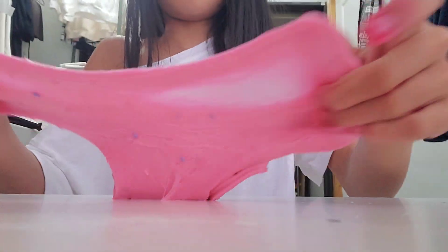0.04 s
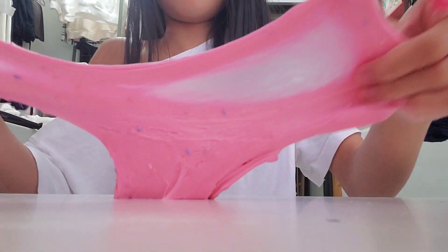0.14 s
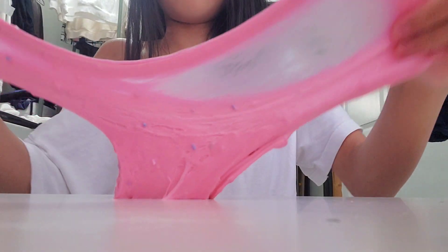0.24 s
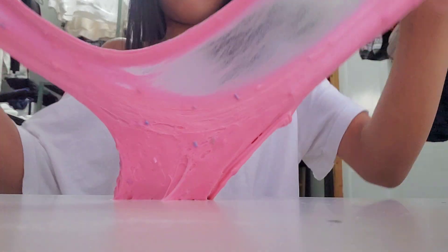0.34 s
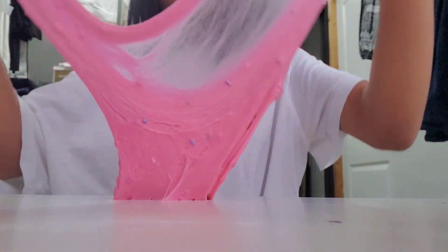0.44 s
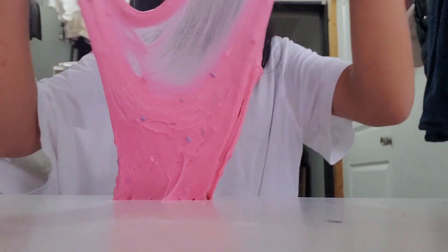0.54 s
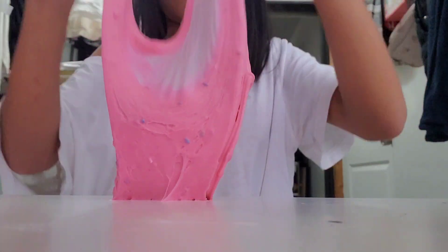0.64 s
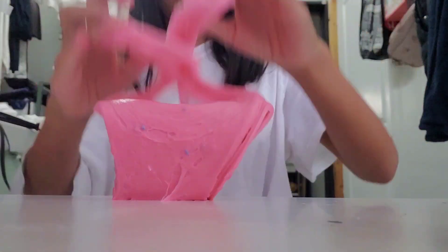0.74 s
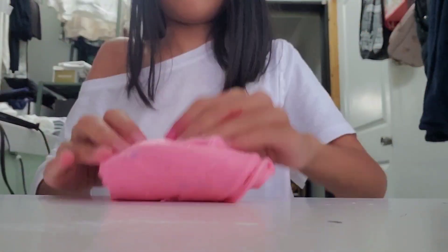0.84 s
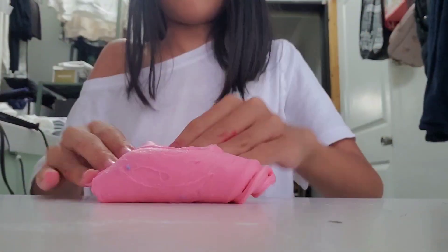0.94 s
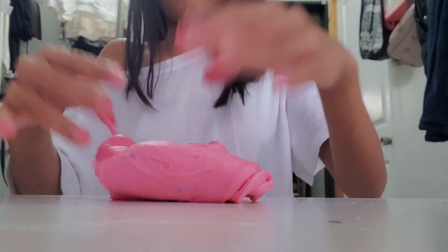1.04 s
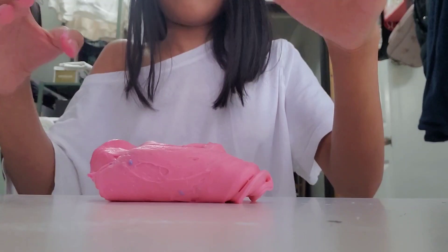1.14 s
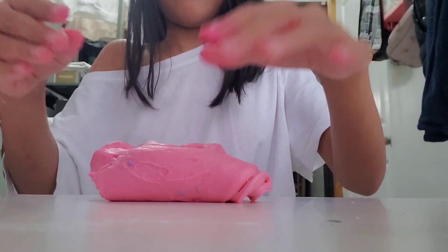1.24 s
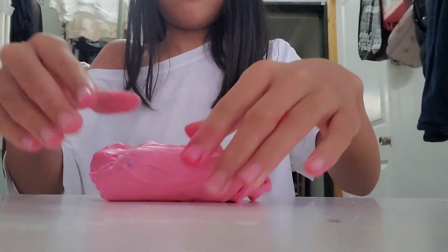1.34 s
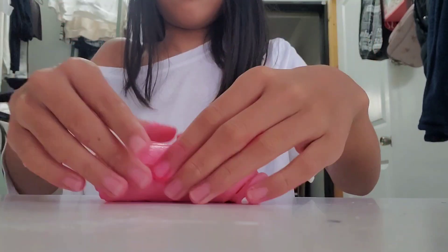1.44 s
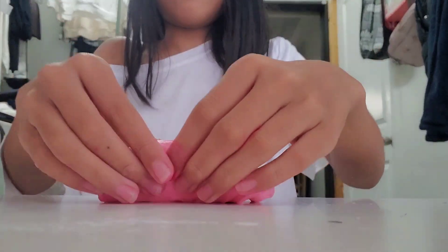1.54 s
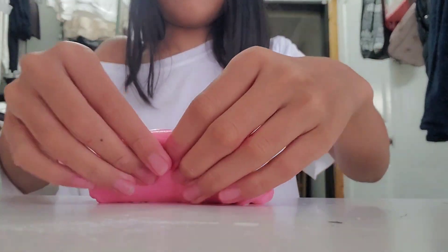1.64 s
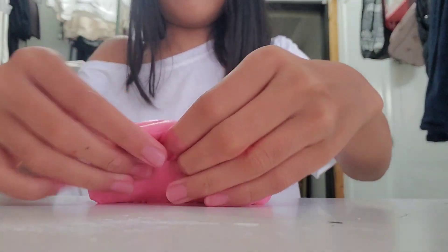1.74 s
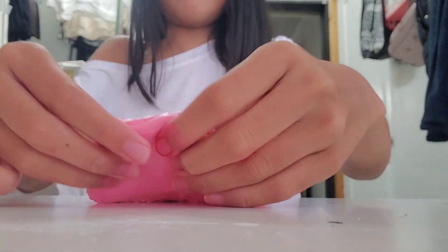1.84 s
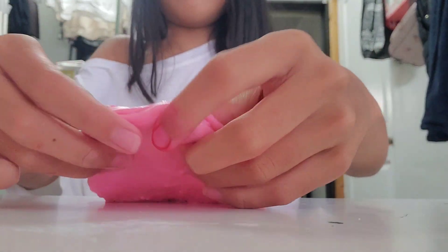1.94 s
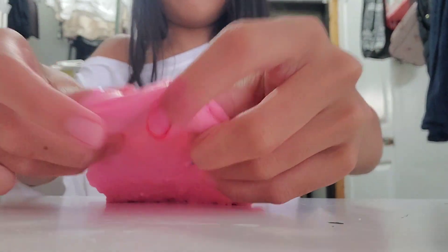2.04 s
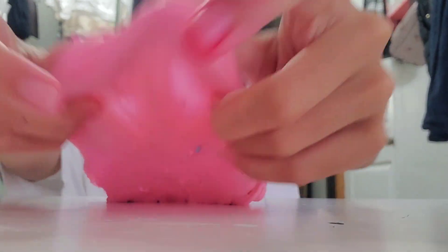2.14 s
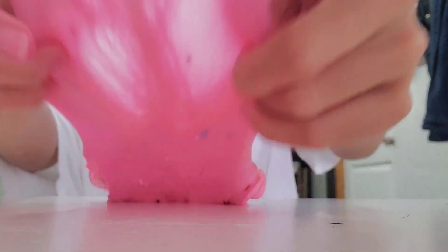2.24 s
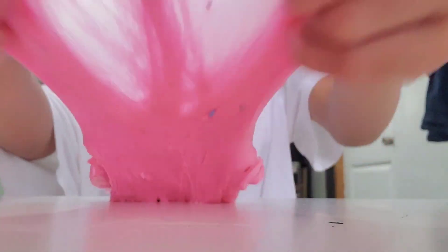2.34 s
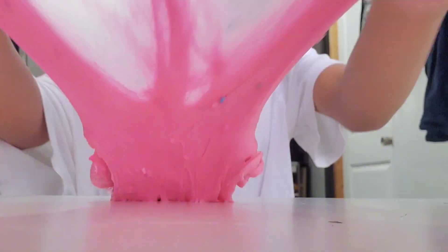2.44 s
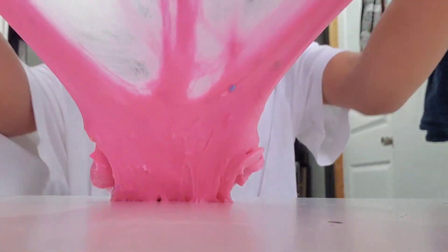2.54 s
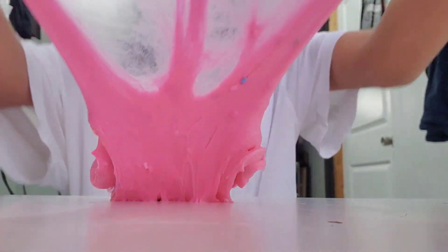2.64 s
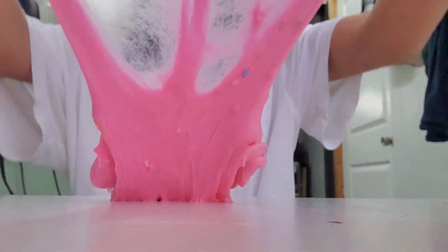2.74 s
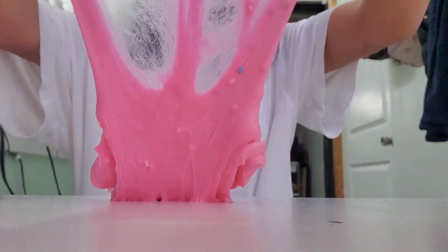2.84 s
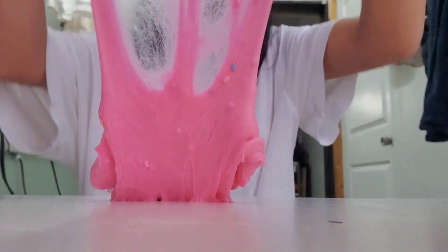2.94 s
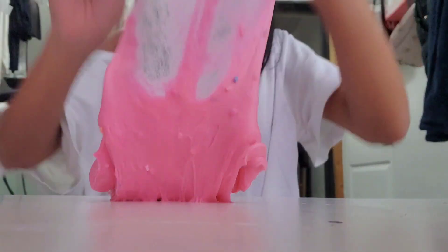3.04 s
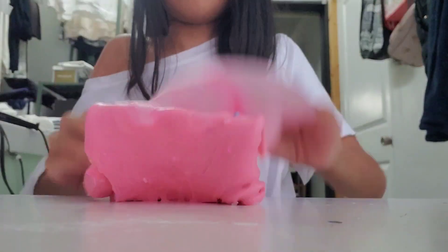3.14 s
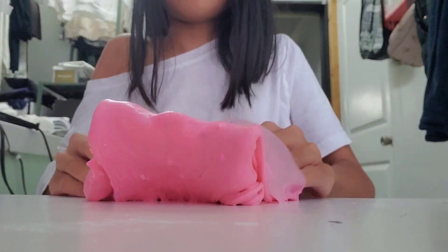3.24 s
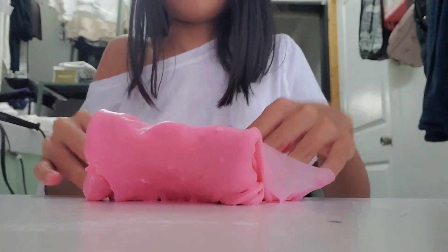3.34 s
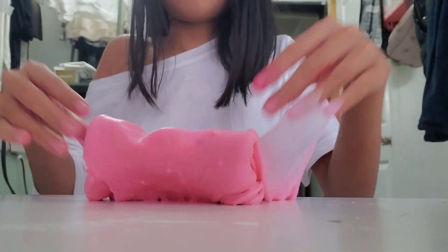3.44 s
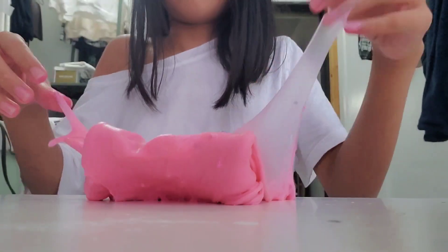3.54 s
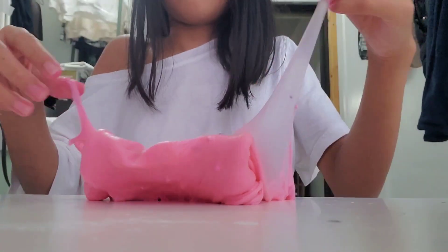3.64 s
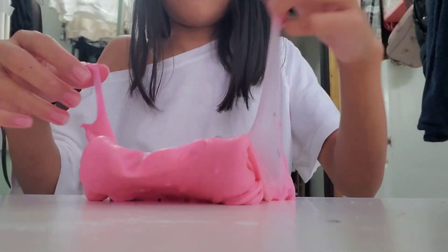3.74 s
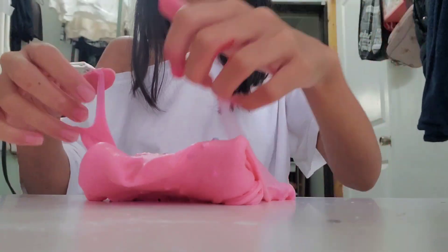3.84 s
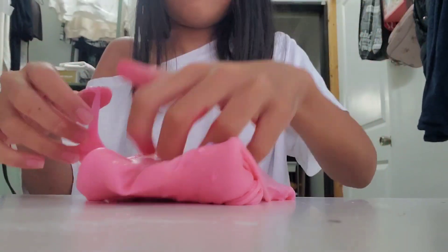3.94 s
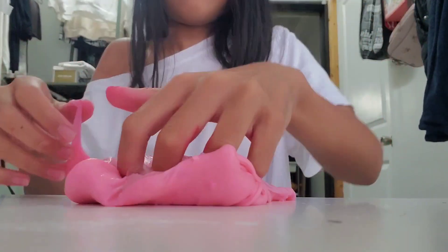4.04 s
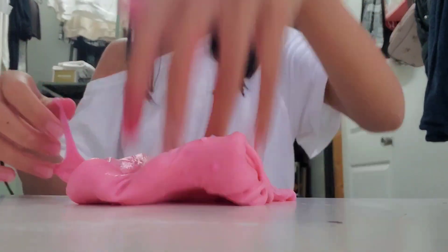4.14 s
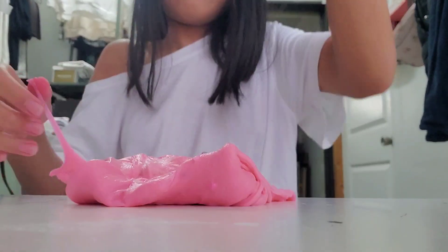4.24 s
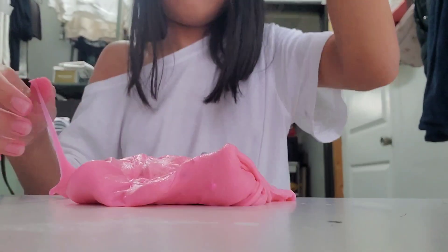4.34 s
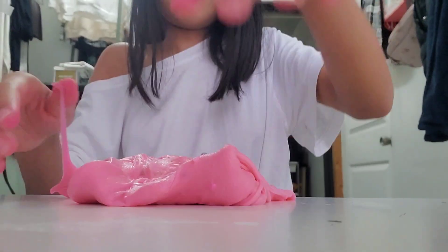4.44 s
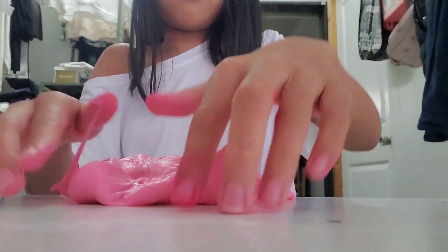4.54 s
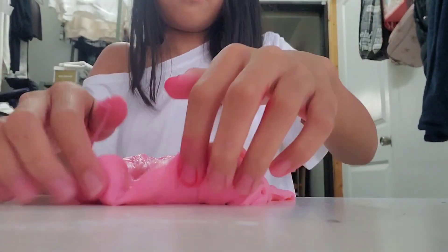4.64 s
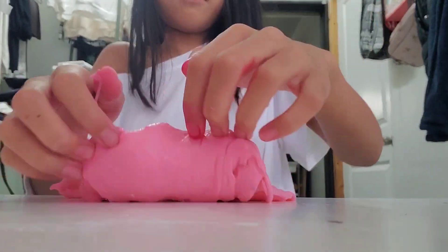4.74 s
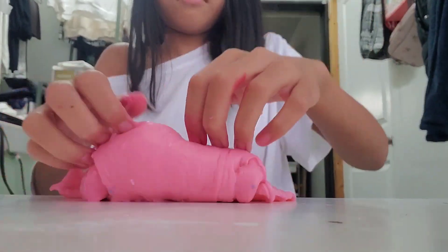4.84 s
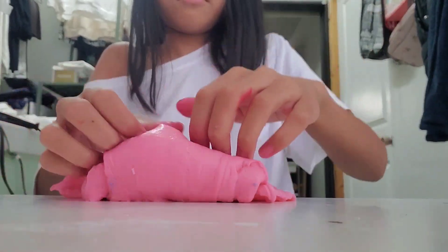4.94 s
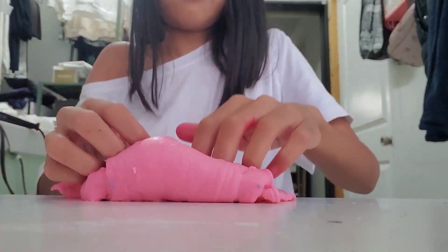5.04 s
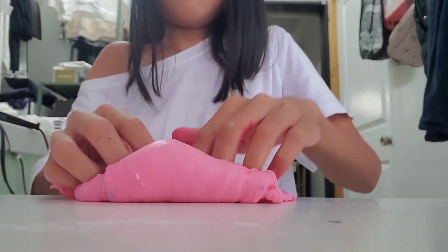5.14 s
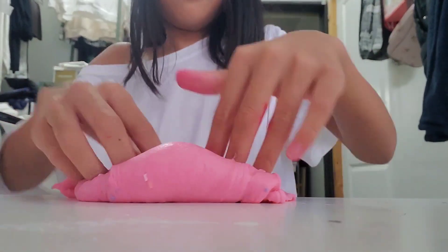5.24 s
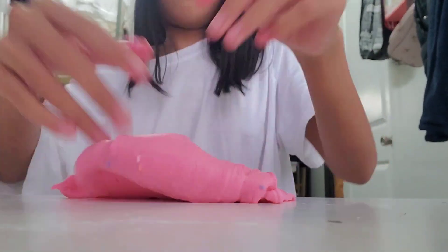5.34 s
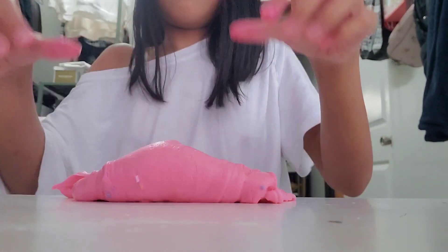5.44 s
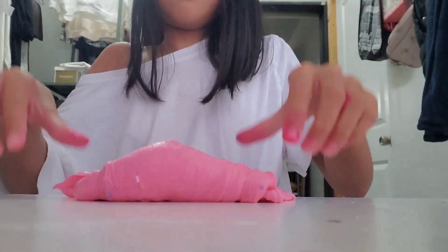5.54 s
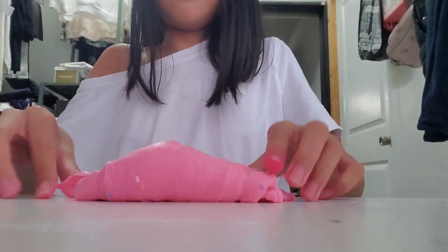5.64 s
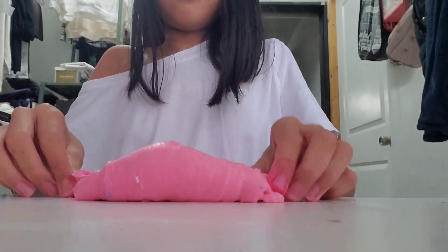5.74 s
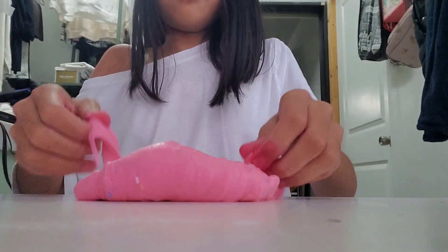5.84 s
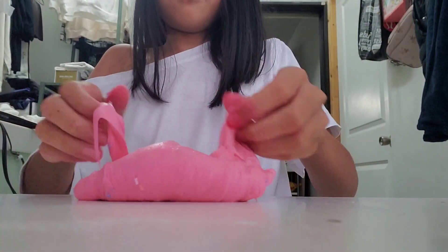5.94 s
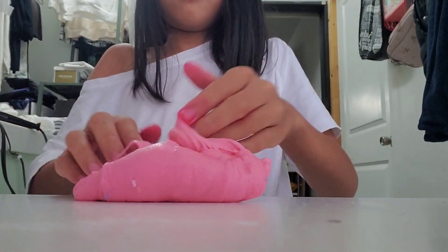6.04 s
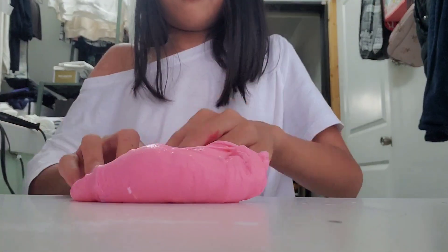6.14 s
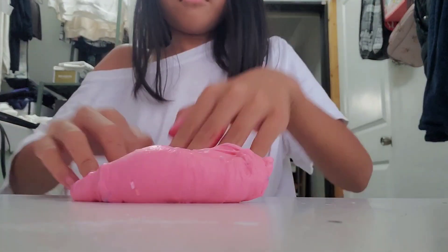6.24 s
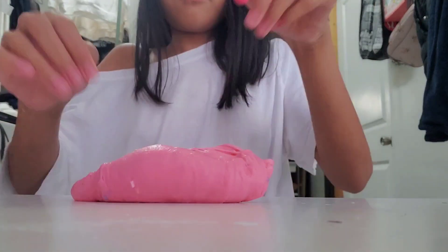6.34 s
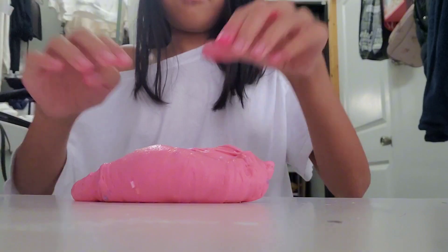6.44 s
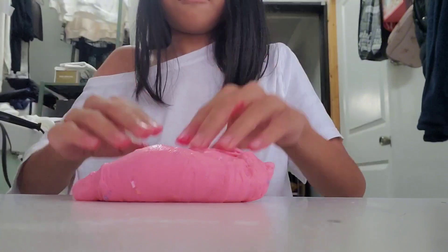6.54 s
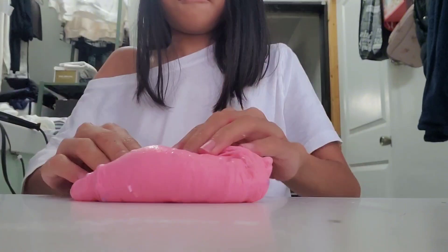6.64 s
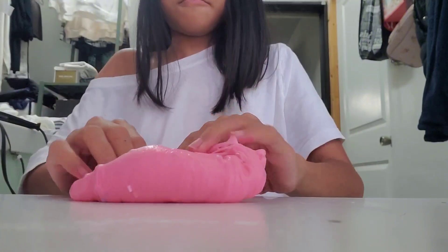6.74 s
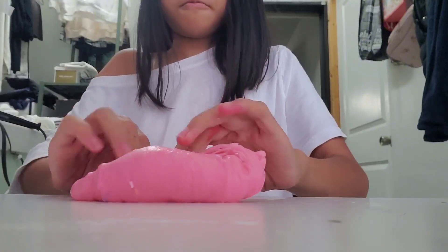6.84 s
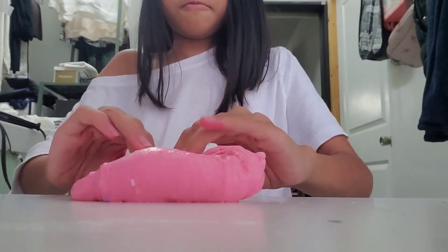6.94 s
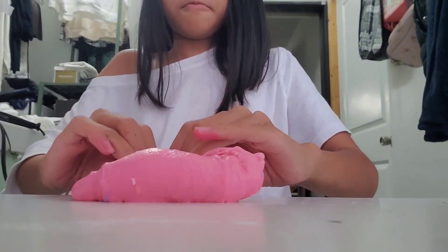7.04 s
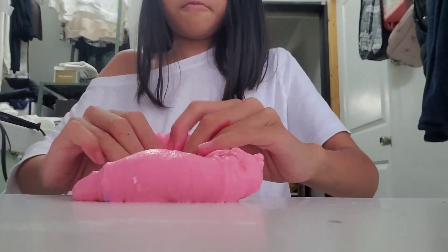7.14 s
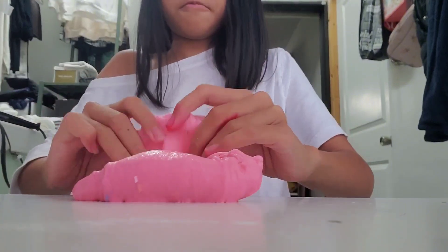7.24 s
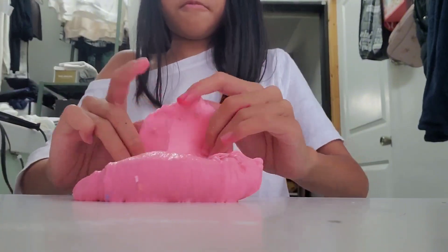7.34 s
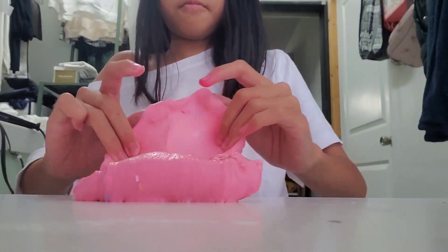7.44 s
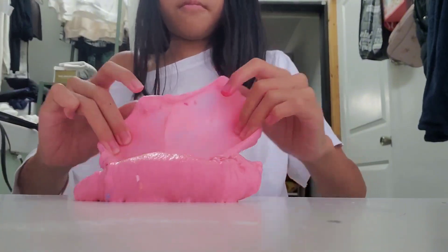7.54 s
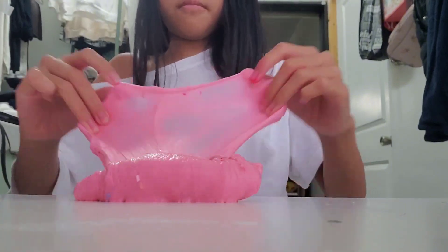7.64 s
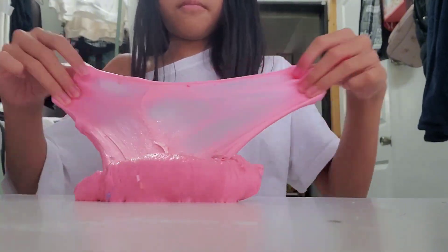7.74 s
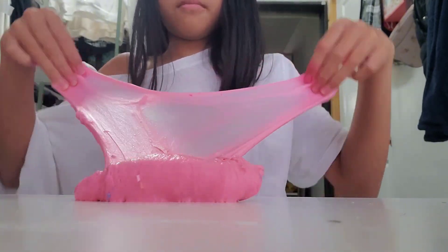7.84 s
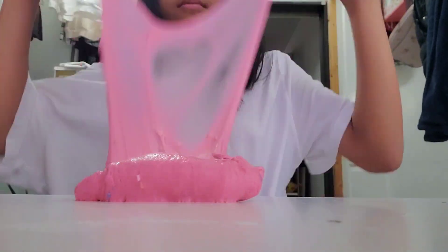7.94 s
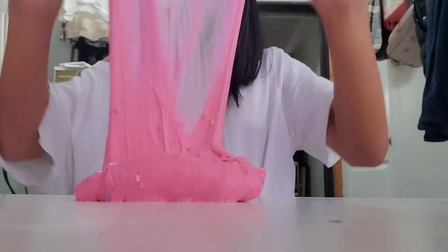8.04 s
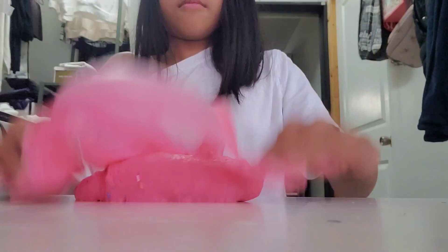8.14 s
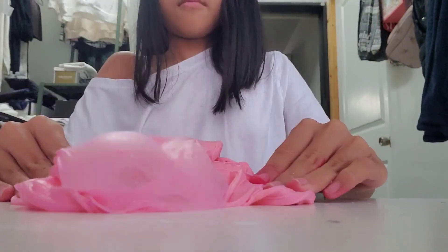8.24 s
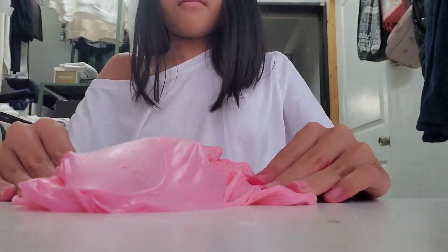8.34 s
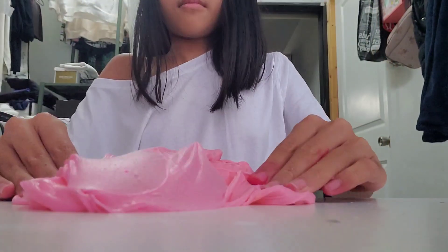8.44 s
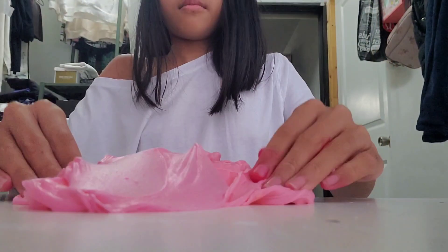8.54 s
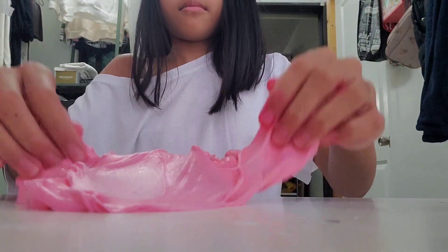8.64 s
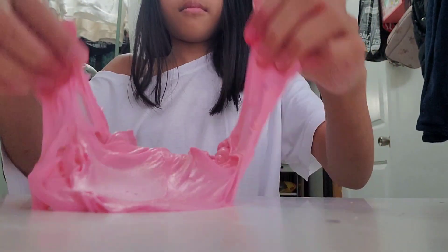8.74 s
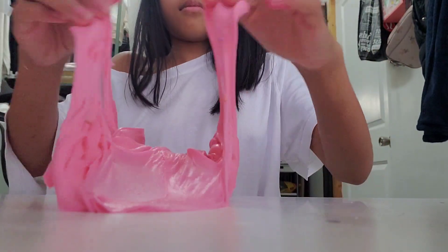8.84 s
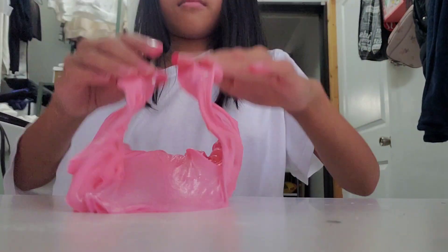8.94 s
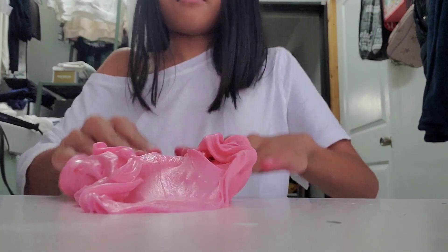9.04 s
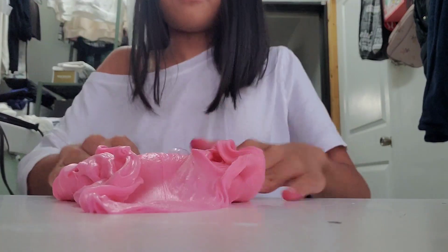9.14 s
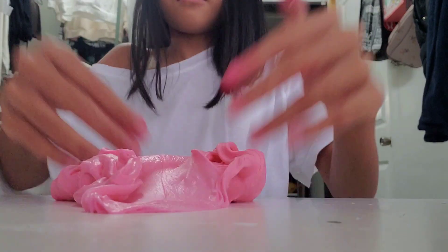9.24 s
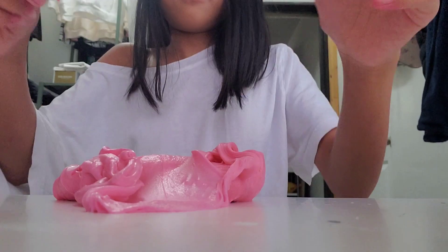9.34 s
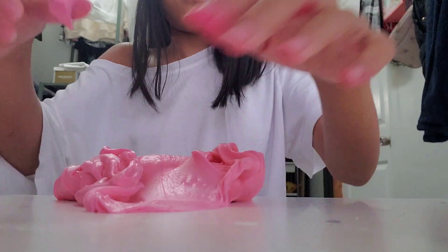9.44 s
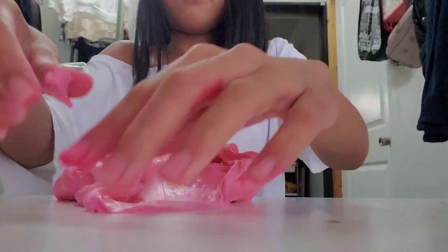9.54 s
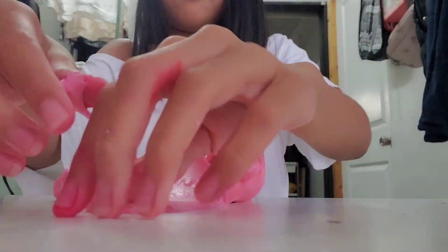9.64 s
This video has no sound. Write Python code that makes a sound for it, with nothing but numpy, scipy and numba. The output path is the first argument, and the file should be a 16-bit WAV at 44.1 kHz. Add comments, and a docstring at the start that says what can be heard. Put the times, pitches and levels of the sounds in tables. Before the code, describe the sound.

Hands knead slime on a table indoors, making sticky clicks, popping air pockets and squelches, with occasional soft thumps over a faint hum.

```python
"""A small furnished room, at a light tabletop: sticky slime is dropped, pressed and peeled.
The board thuds under lump and fingers, trapped air pops, and skin peels off the slime in a dense
crackle of parting threads, with a squelch and small ringing bubbles. Stretched films fizz faintly.
Two microphones stand on the same table, over a low household hum."""
import sys
import numpy as np
from scipy import signal
from scipy.fft import rfft, irfft, next_fast_len
from scipy.io import wavfile
from numba import njit

SR = 44100
rng = np.random.default_rng(int(sys.argv[2]) if len(sys.argv) > 2 else 0)


def wrap_up_sound(samples):
    """Save the sound to the file named by the first command line argument, as 16-bit audio."""
    columns = np.atleast_2d(samples).T
    # keep every value between -1 and 1, then stretch to whole-number steps
    tamed = np.clip(columns, -1, 1)
    steps = np.round(tamed * 32767).astype(np.int16)
    wavfile.write(sys.argv[1], SR, steps)


N = 427329


def from_db(db):
    return 10 ** (np.asarray(db) / 20)


def unit_rms(x):
    return x / np.sqrt(np.mean(x ** 2) + 1e-20)


def in_time(rows):
    """Table columns interpolated to every sample."""
    time_s, *columns = np.transpose(rows)
    return [np.interp(np.arange(N) / SR, time_s, column) for column in columns]


def at_hz(rows, hz):
    """Table value on a log-frequency axis."""
    freq_hz, values = np.transpose(rows)
    return np.interp(np.log(hz + 1), np.log(freq_hz), values)


def drift(rate_hz):
    """Slow random wander, rms 1."""
    hop = 40
    pole = np.exp(-2 * np.pi * rate_hz * hop / SR)
    slow = signal.lfilter([1], [1, -2 * pole, pole * pole], rng.standard_normal(N // hop + 2002))[2000:]
    return np.interp(np.arange(N) / hop, np.arange(len(slow)), unit_rms(slow))


def ring(force, hz, t60_s):
    """Damped mode: a unit click starts a unit sine."""
    radius, angle = from_db(-60 / (t60_s * SR)), 2 * np.pi * hz / SR
    return signal.lfilter([0, np.sin(angle)], [1, -2 * radius * np.cos(angle), radius ** 2], force + 1e-18)


def stereo(mid, side, spectrum, correlation):
    """Two independent signals, coloured and mixed to left and right; rms 1."""
    size = next_fast_len(N)
    hz = np.arange(size // 2 + 1) * SR / size
    alike = np.clip(at_hz(correlation, hz), -1, 1)
    mid = rfft(mid, size) * np.sqrt(1 + alike)
    side = rfft(side, size) * np.sqrt(1 - alike)
    coloured = from_db(at_hz(spectrum, hz)) * np.array([mid + side, mid - side])
    return unit_rms(irfft(coloured, size)[:, :N])


def grains(per_s, spread_db, clump_db):
    """Slime threads let go at random: two trains of uneven, clumped clicks."""
    sizes = from_db(spread_db * np.minimum(rng.exponential(1, (2, N)), 3.5))
    signs = rng.choice([-1, 1], (2, N))
    parting = rng.random((2, N)) < per_s / SR
    clumps = from_db(clump_db * (drift(85) + 0.72 * drift(12)))
    return sizes * signs * parting * clumps


# Room tone spectrum: freq_hz, density_db
HUM_SPECTRUM = [(12, -57), (20, -23), (60, 1), (88, -12.5), (123, 2.5), (146, -26.5), (172, -3.5),
                (285, -15), (319, -8), (347, -21.5), (499, -25), (759, -26.5), (1090, -36.5), (5680, -53.5),
                (16000, -47)]
# Room tone loudness: time_s, level_db
HUM_CURVE = [(0, -62.5), (5.5, -61), (8.1, -59.5), (8.6, -58), (8.85, -67), (9.1, -64), (9.69, -58)]
# Room tone, left against right: freq_hz, correlation
HUM_CORRELATION = [(60, 0.56), (290, 0.94), (640, 0.033), (1400, 0), (3000, 0)]

def hum():
    """Household room tone, wavering slightly."""
    level_db, = in_time(HUM_CURVE)
    tone = stereo(*rng.standard_normal((2, N)), HUM_SPECTRUM, HUM_CORRELATION)
    return tone * from_db(level_db + 1.8 * drift(0.77))


# Faint rustle of stretching slime: time_s, crackle_db, squelch_db, fizz_db
STRETCH_RUSTLE = [(0, -70.5, -87, -72), (.35, -79.5, -79.5, -84), (.78, -87, -84.5, -75),
                  (1.3, -86, -80, -84), (2.0, -69, -84.5, -73), (2.7, -83, -85, -81),
                  (3.15, -80, -79.5, -78.5), (3.599, -87.5, -87, -86.5), (7, -83.5, -75.5, -79.5),
                  (8.1, -86.5, -88, -85), (8.9, -93, -87.5, -94), (9.69, -100, -82.5, -95)]

def fizz():
    """Thin stretched films fizz in the top treble."""
    _, _, fizz_db = in_time(STRETCH_RUSTLE)
    highpass = signal.butter(4, 11100, "high", fs=SR, output="sos")
    mid, side = signal.sosfilt(highpass, grains(6000, spread_db=2.5, clump_db=0))
    return from_db(fizz_db) * unit_rms(np.array([mid + side, mid - side]))


def bubbles():
    """Scattered small bubbles, each ringing 14 cycles at one of 12 pitches; rms 1."""
    births = grains(130, spread_db=2.5, clump_db=1)
    pitches_hz = np.geomspace(550, 4200, num=12)
    choice = rng.integers(0, len(pitches_hz), N)
    mid, side = sum(ring(births * (choice == k), hz, t60_s=14 / hz) for k, hz in enumerate(pitches_hz))
    return unit_rms(np.array([mid + side / 2, mid - side / 2]))


# Fine crackle spectrum: freq_hz, density_db
CRACKLE_SPECTRUM = [(1500, 6), (3000, 4), (8000, -2.5), (10500, -2), (13500, 1), (16000, -1.5)]
# Coarse squelch spectrum: freq_hz, density_db
SQUELCH_SPECTRUM = [(250, -1), (600, 4), (1150, 3), (2000, -7.5), (3500, -8.5), (8000, -23)]
# Slime, left against right: freq_hz, correlation
SLIME_CORRELATION = [(300, 0.52), (1500, 0.043), (8000, 0.067)]

def peel(crackle_db, squelch_db, hollow_hz, hollow_db):
    """Parting threads crackle and squelch; bubbles ring in the hollow left by the finger."""
    crackle = stereo(*grains(11000, spread_db=1, clump_db=2.5), CRACKLE_SPECTRUM, SLIME_CORRELATION)
    squelch = stereo(*grains(2000, spread_db=3, clump_db=4), SQUELCH_SPECTRUM, SLIME_CORRELATION)
    mid, side = grains(1200, spread_db=3, clump_db=3)
    hollow_hz = hollow_hz * (1 + 0.027 * drift(12))   # the hollow changes shape
    cavity = np.array([hollow(hollow(mid + way * side, hollow_hz), hollow_hz) for way in (0.5, -0.5)])
    wet = 0.75 * squelch + from_db(-5.5) * bubbles() + from_db(hollow_db) * unit_rms(cavity)
    return from_db(crackle_db) * crackle + from_db(squelch_db) * wet


@njit
def hollow(x, hz):
    """Finger hollow: a moving resonance, peak gain 1."""
    width_hz = 450
    radius = np.exp(-np.pi * width_hz / SR)
    out = np.zeros(len(x))
    for i in range(2, len(x)):
        feedback = 2 * radius * np.cos(2 * np.pi * hz[i] / SR) * out[i - 1] - radius ** 2 * out[i - 2]
        out[i] = (1 - radius ** 2) / 2 * (x[i] - x[i - 2]) + feedback
    return out


# Slime lands, is poked or peels off skin:
# peak_s, swell_ms, hold_ms, fade_ms_per_20db, crackle_db, squelch_db, hollow_hz, hollow_re_squelch_db
SQUISH_EVENTS = [(0.722, 50, 24, 58, -71.5, -82, 1788, 5), (.84, 30, 110, 150.5, -62.5, -54, 3596, -18),
                 (1.066, 34, 3.3, 22, -34, -40.5, 1146, -11), (1.552, 32, 2.7, 43.5, -64, -48, 1193, -10),
                 (1.79, 13, 43, 82.5, -63, -64, 1173, -11), (1.95, 78, 21, 87, -64, -75, 1218, -20),
                 (2.31, 51, 50, 67.5, -64.5, -75, 2404, -13.5),
                 (3.177, 4, 3.5, 32.5, -45.5, -50.5, 4177, -6), (3.21, 19, 3, 58.5, -37.5, -31, 1157, -26),
                 (3.388, 120, 38, 72.5, -55.5, -57.5, 2477, -8.5),
                 (4.019, 61, 8.8, 56, -61, -52.5, 2210, -16), (4.166, 39, 30, 6, -32.5, -38, 1087, -13),
                 (4.21, 18, 2.7, 63.5, -60, -51, 1115, -12), (4.56, 10, 78, 103, -80.5, -53.5, 2800, -22),
                 (4.72, 170, 15, 83.5, -43, -50.5, 1307, -8),
                 (5.041, 6.9, 71, 96.5, -67.5, -61, 1330, -2.5), (5.153, 40, 1.9, 63, -56, -55, 1982, -12),
                 (5.209, 37, 40, 45, -65, -62, 1900, -14), (5.257, 11, 20, 34.5, -50, -48, 1900, -4),
                 (5.298, 36, 4.1, 61.5, -38, -32, 1909, -11.5),
                 (5.341, 10, 23, 31.5, -28.5, -33, 2242, -17), (5.619, 3, 3.7, 5.5, -61, -38, 1964, -22),
                 (5.633, 13, 31, 123, -61, -45, 1972, -7.5), (5.712, 40, 42, 59.5, -52, -48.5, 1980, -0.5),
                 (5.809, 50, 91, 113.5, -47.5, -56.5, 2098, -3), (6.124, 54, 5, 300, -66.5, -62, 1784, -11),
                 (6.299, 27, 13, 39.5, -45, -36.5, 1090, -21.5),
                 (6.601, 7.9, 11, 120.5, -54.5, -41, 1200, -26),
                 (6.721, 77, 106, 170, -63, -60.5, 2115, -20), (7.09, 32, 64, 56, -71, -63, 2560, -4),
                 (7.178, 60, 7.1, 62.5, -54.5, -59.5, 1882, -2),
                 (8.119, 20, 44, 58, -66.5, -63, 1015, -3.5),
                 (8.176, 5.5, 1.4, 15.5, -27.5, -11.5, 1143, -17),
                 (8.227, 65, 1.9, 126.5, -59.5, -40.5, 650, -2),
                 (8.451, 170, 89, 101, -99, -77.5, 1129, 5.5),
                 (8.629, 92, 4.3, 197.5, -54.5, -56.5, 1410, -4.5),
                 (9.06, 28, 80, 81.5, -73, -64.5, 1777, -5.5), (9.226, 34, 39, 42, -54, -45.5, 1860, -9),
                 (9.662, 36, 30, 100, -74.5, -70, 988, -7)]

def squishes():
    """Curves for peel(): squishes swell, hold and fade over the rustle; the loudest sets the hollow."""
    t = np.arange(0, N, 20) / SR
    peak_s, swell_ms, hold_ms, fade_ms, *layers_db, hz, hollow_db = np.transpose(SQUISH_EVENTS)[:, :, None]
    age_ms = (t - peak_s) * 1000
    swell = np.clip(1 + age_ms / np.maximum(swell_ms, 1), 0, 1) ** 1.6
    fade = from_db(-20 * np.maximum(age_ms - hold_ms, 0) / np.maximum(fade_ms, 2))
    crackle, squelch = from_db(layers_db) * swell * fade
    loudest = np.argmax(squelch, axis=0)
    powers = [np.sum(layer ** 2, axis=0) + 1e-20 for layer in (crackle, squelch)]
    curves = np.column_stack([t, *powers, hz[loudest, 0], hollow_db[loudest, 0]])
    crackle_power, squelch_power, hz, hollow_db = in_time(curves)
    crackle_floor, squelch_floor, _ = from_db(in_time(STRETCH_RUSTLE))
    crackle_db = 10 * np.log10(crackle_power + crackle_floor ** 2)
    squelch_db = 10 * np.log10(squelch_power + squelch_floor ** 2)
    hollow_db += 10 * np.log10(squelch_power) - squelch_db   # the rustle has no hollow
    return crackle_db, squelch_db, hz, hollow_db


# Air pockets burst: start_s, level_db, pitch_hz, snap_re_level_db
AIR_POCKETS = [(0.814, -43, 3120, -14), (0.825, -41, 1770, -21), (0.8409, -27.5, 3400, -25),
               (0.8846, -38.5, 2400, -12), (0.924, -41.5, 2630, 1.5), (0.9759, -44, 500, -16),
               (1.0545, -42, 5860, 13), (1.0675, -30, 1010, -3), (1.5403, -53, 1030, -23),
               (1.613, -45.5, 3740, 9), (1.842, -51, 1140, -28), (1.865, -49, 1170, -10),
               (1.951, -54, 1710, 6), (2.008, -54, 3520, -17), (2.122, -57, 3530, -20),
               (2.206, -43.5, 4740, -29), (2.305, -53, 2700, -25), (2.326, -46.5, 2220, -3),
               (3.176, -23, 3980, -17), (3.2076, -14, 1240, -5.5), (4.0045, -27, 3600, -18),
               (4.0182, -37, 1040, -5), (4.029, -25, 2600, -6.5), (4.081, -36.5, 3200, -8),
               (4.161, -25, 1150, 4), (4.1712, -18, 1060, 1.5), (4.233, -37.5, 3300, -6),
               (4.7166, -32, 3400, -1.5), (4.729, -35.5, 1300, 10), (4.7881, -41.5, 2350, 0),
               (5.0396, -43, 1380, -23), (5.144, -40.5, 1830, -16), (5.153, -37, 2160, -5),
               (5.208, -43, 1680, 25), (5.2549, -35, 1900, -15), (5.2731, -23, 1790, -23),
               (5.297, -26.5, 1290, -1.5), (5.3, -19, 410, -39), (5.322, -22, 400, -33.5),
               (5.3148, -20.5, 948, 0.5), (5.3403, -19, 1110, -7), (5.384, -27, 1510, -7),
               (5.6192, -31, 1930, -17), (5.6197, -25, 420, -39.5), (5.6312, -19, 1820, -24),
               (5.66, -26.5, 400, -45), (5.661, -34, 2600, -23), (5.7387, -26.5, 2000, -27),
               (5.7798, -29.5, 3780, -14), (5.8653, -30, 4300, -5), (5.92, -40, 1880, -20),
               (5.937, -42, 2000, -25), (6.121, -42.5, 1750, -10), (6.2924, -29, 4500, -14),
               (6.298, -26, 620, -24.5), (6.6001, -28, 1150, -31), (6.628, -48, 890, -22),
               (6.705, -45, 3680, -4), (6.728, -32, 3700, -18), (6.747, -38, 1950, 0),
               (6.7708, -39.5, 3600, 14.5), (6.86, -42, 1730, -4), (7.3264, -47, 2070, 3.5),
               (8.174, -13, 2460, -12), (8.1775, -13, 1096, -14.5), (8.1781, -10, 640, -38.5),
               (8.189, -18.5, 1550, -2.5), (8.2259, -13.5, 830, -39), (8.228, -13.5, 232, -46),
               (8.504, -47, 1170, -42), (8.629, -38, 1110, -13.5), (8.6512, -37.5, 1390, -10.5),
               (8.7222, -48, 1810, -19.5), (9.2574, -39, 1010, -15), (9.318, -40, 2150, -8.5)]

def pops():
    """Each pocket rings a few cycles, rising as it opens, with a wet splat and a crisp snap."""
    size = 2048
    rise_per_s, snap_t60_s, splat_t60_s = 7.3, 0.004, 0.032
    out, t = np.zeros((2, N + size)), np.arange(size) / SR
    highpass = signal.butter(1, 3000, "high", fs=SR)
    for start_s, level_db, hz, snap_db in AIR_POCKETS:
        white = rng.standard_normal((3, size))
        noise = white[0] + 0.8 * white[1:]   # shared plus per side
        tone = np.sin(2 * np.pi * hz * t * (1 + rise_per_s * t)) * from_db(-60 * t * hz / 12)
        snap = signal.lfilter(*highpass, noise) * from_db(min(snap_db, 8) - 1 - 60 * t / snap_t60_s)
        band = signal.butter(2, [hz / 1.2, hz * 1.5], "band", fs=SR)
        splat = signal.lfilter(*band, noise) / np.sqrt(hz / 1000) * from_db(1 - 60 * t / splat_t60_s)
        at = round(start_s * SR)
        out[:, at:at + size] += from_db(level_db) * (tone + snap + splat)
    return out[:, :N]


# Lump or fingers load the board: start_s, push_db, upper_re_push_db
PUSHES = [(0.843, -30, -8.5), (0.886, -31, -27), (1.068, -27, -7), (1.429, -43.5, -27), (1.501, -39.5, -15),
          (3.208, -8, -17), (3.386, -40, 3), (3.565, -49, -2), (3.985, -38.5, -18.5), (4.185, -30, -18.5),
          (4.227, -32, -8), (4.574, -16.5, -14.5), (4.636, -27.5, -10), (5.298, -21.5, -8.5),
          (5.334, -21.5, -5.5), (5.444, -31, -9), (5.631, -22.5, 3.5), (5.712, -30, -33), (5.809, -24, 1.5),
          (5.886, -35, -22), (6.299, -24, 3), (6.601, -27, 8.5), (6.624, -29, 1.5), (8.178, -8, -6.5),
          (8.229, -16, 2.5), (9.054, -48, -14), (9.093, -34.5, -10), (9.225, -42.5, -3), (9.325, -43, 1.5),
          (9.593, -43, -21), (9.653, -45.5, 7.5)]
# Low board modes: pitch_hz, gain_db, t60_s
LOW_MODES = [(60.3, -20, 0.8), (76, -16, 0.11), (88, 1.5, 0.15), (122, -10, 0.1), (166, -3.5, 0.055)]
# Upper board modes: pitch_hz, gain_db, t60_s
UPPER_MODES = [(169, 1, 0.11), (247, -2, 0.061), (280, -7.5, 0.066), (328, -10, 0.17), (377.6, -0.5, 0.064),
               (426, -4.5, 0.034), (630, -5, 0.04)]

def board(kneading):
    """Pushes strike the tabletop's modes; kneading keeps them stirring."""
    start_s, push_db, upper_db = np.transpose(PUSHES)
    at = np.round(start_s * SR).astype(int)
    load = kneading.copy()
    load[at] += from_db(push_db)
    wobble = ring(load, hz=120, t60_s=0.032) * from_db(-38)   # weight arrives as a wobble: lows swell in
    low = sum(ring(wobble, hz, t60_s) * from_db(gain_db) for hz, gain_db, t60_s in LOW_MODES)
    scatter_db = rng.normal(-6, 3, (len(at), len(UPPER_MODES)))
    upper = np.zeros((2, N))
    for k, (hz, gain_db, t60_s) in enumerate(UPPER_MODES):
        force = kneading * from_db(gain_db)
        force[at] += from_db(push_db + upper_db + gain_db + scatter_db[:, k])
        pan_db = np.array([[2], [-2]]) * (-1) ** k   # nodal lines lie between the microphones
        upper += ring(force, hz, t60_s) * from_db(pan_db)
    cushion_hz = 600   # slime softens each contact
    pole = np.exp(-2 * np.pi * cushion_hz / SR)
    cushioned = signal.lfilter([(1 - pole) ** 2], [1, -2 * pole, pole ** 2], upper)
    return low * from_db([[-0.9], [0.9]]) + cushioned


# Room decay: freq_hz, t60_s
ROOM_DECAY = [(250, 0.32), (1000, 0.27), (8000, 0.15)]

def room(x):
    """Reverberation: a noise tail per side, dying faster in the treble."""
    t = np.arange(SR // 2) / SR
    white = rng.standard_normal((2, len(t)))
    tail, predelay_s = 0, 0.004
    for hz in 250 * 2.0 ** np.arange(6):
        octave = signal.butter(2, [hz / np.sqrt(2), hz * np.sqrt(2)], "band", fs=SR, output="sos")
        decay = from_db(-60 * t / at_hz(ROOM_DECAY, hz)) * (t > predelay_s)
        tail = tail + signal.sosfilt(octave, white) * decay
    return signal.fftconvolve(x, tail / np.sqrt(np.sum(tail ** 2) / 2), axes=1)[:, :N]


def scene():
    """Slime, table, room and hum; the slime lies nearer the right microphone."""
    crackle_db, squelch_db, hollow_hz, hollow_db = squishes()
    kneading = rng.standard_normal(N) * from_db(squelch_db - 27.5)
    slime = pops() + fizz() + peel(crackle_db, squelch_db, hollow_hz, hollow_db)
    pan_db, left_lag_samples = [[-1.5], [1.5]], 4
    slime *= from_db(pan_db)
    slime[0] = np.roll(slime[0], left_lag_samples)
    table = board(kneading)
    return slime + table + room(from_db(-17) * slime + from_db(-14.5) * table) + hum()


def record(dry):
    """Band limit: 36 Hz to 15.9 kHz."""
    highpass = signal.butter(4, 36, "high", fs=SR, output="sos")
    lowpass = signal.ellip(8, 0.5, 60, 15900, fs=SR, output="sos")
    return signal.sosfilt(lowpass, signal.sosfilt(highpass, dry))


dry = scene()
out = record(dry)
wrap_up_sound(out)
```